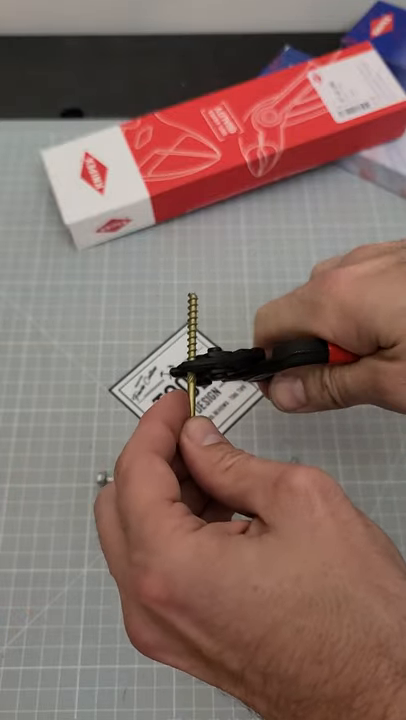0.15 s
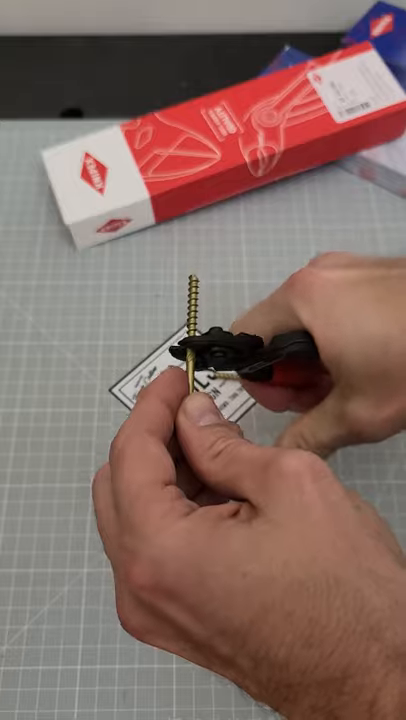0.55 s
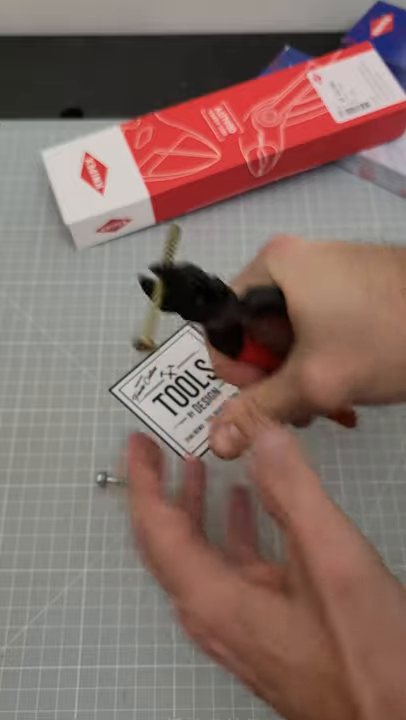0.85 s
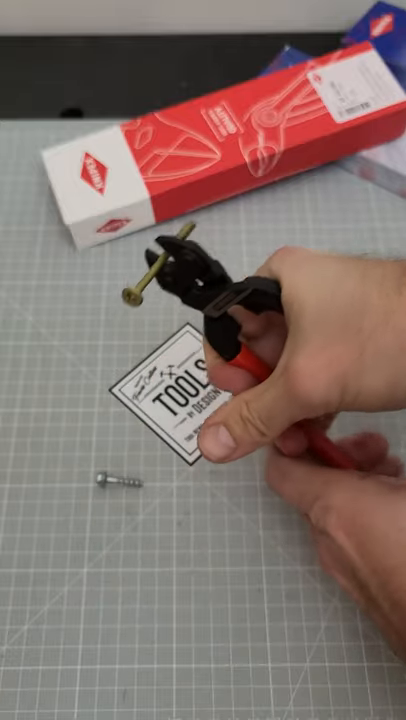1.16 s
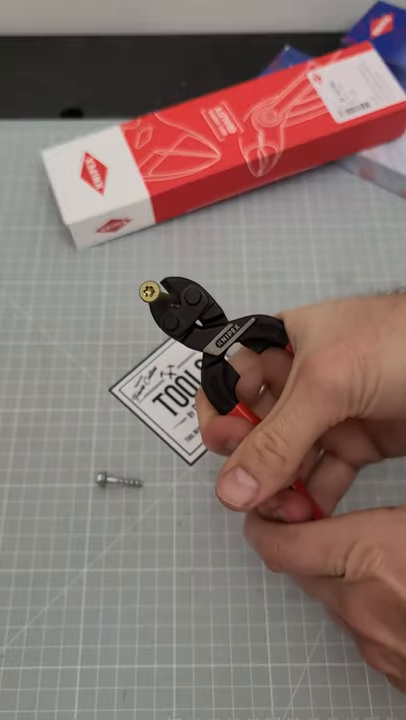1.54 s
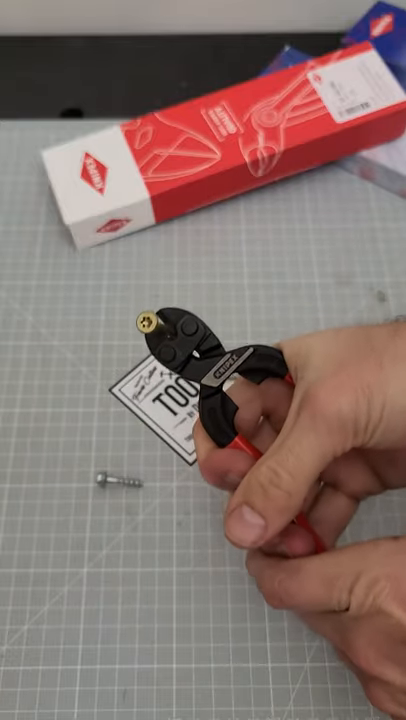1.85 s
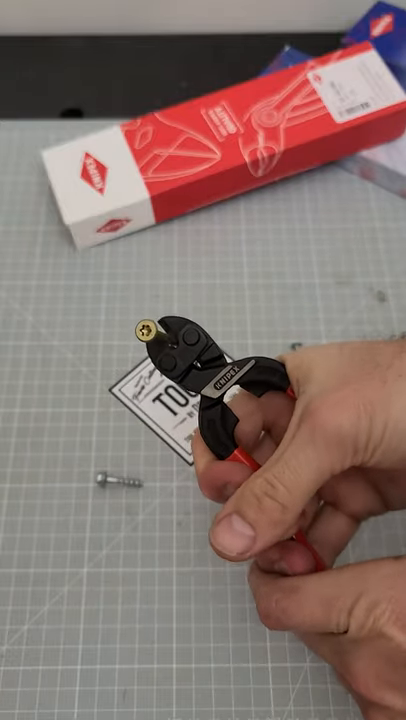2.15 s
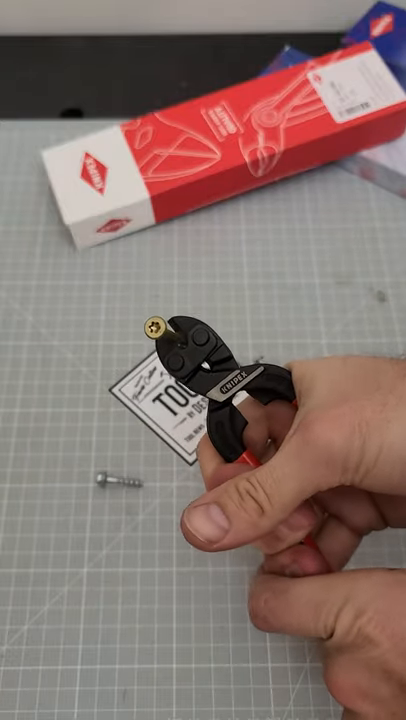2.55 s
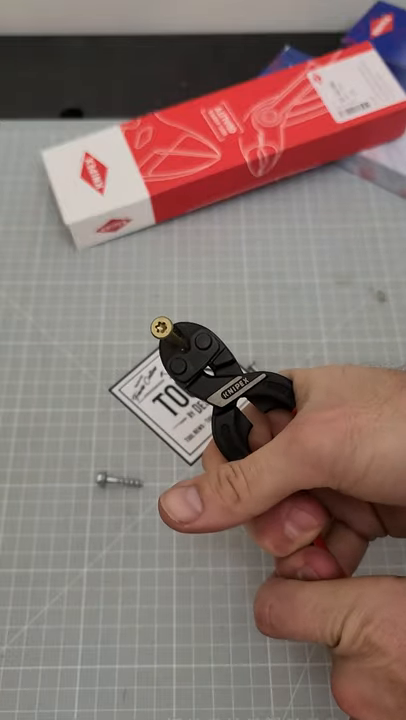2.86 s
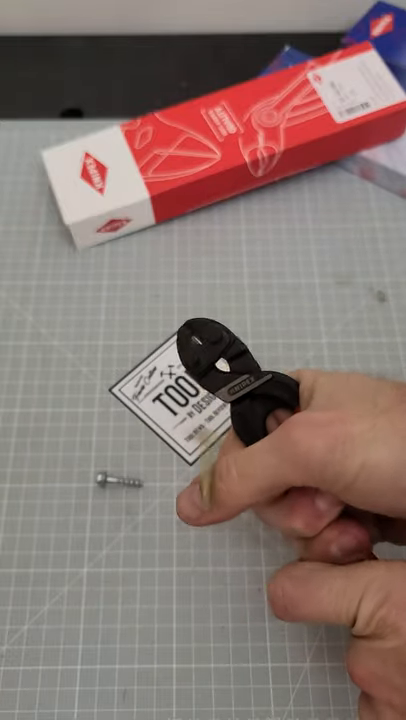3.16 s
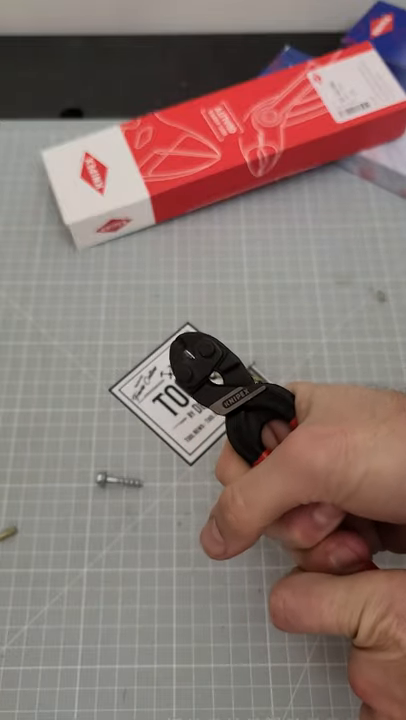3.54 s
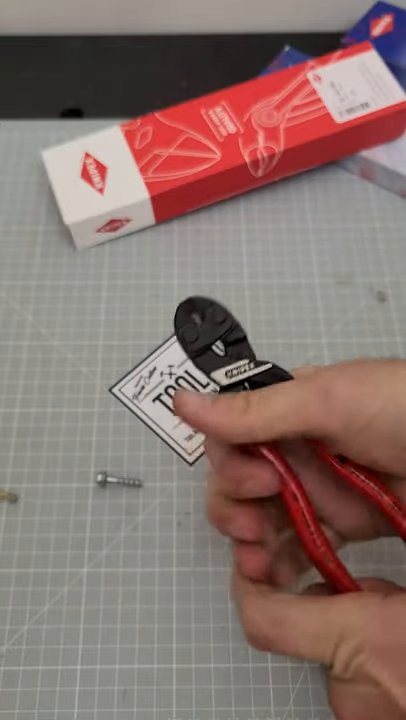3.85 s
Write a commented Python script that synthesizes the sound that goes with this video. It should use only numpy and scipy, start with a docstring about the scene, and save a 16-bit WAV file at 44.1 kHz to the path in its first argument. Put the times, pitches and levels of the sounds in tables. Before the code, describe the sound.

Small bolt cutters snap a steel screw, heard close in a quiet room. Faint jaw scrapes, soft bumps and a hand rubbing over a mat fill the first two seconds. From 2.4 to 2.9 seconds the jaws tick under load. At 3.1 comes the loud, sharp snap with a brief metallic ring. The cut piece bounces and clinks on the table, rolls, and drops off with a dull thud at 3.8.

```python
"""In a quiet, bare room, small bolt cutters bite through a steel screw above a table.
A hand rubs over the cutting mat, exciting friction noise. The jaws tick by stick-slip as the load builds,
then the screw fractures and the impulse sets the steel ringing. A cut piece bounces and rings on the
mat, rolls away and drops off the table with a dull thud. Each impact is a click with a short, dense
vibration; the stronger ones add decaying modes and the room's diffuse reverberation."""
import sys
import numpy as np
from scipy import signal
from scipy.fft import rfft, irfft
from scipy.io import wavfile

SR = 44100
rng = np.random.default_rng(int(sys.argv[2]) if len(sys.argv) > 2 else 0)


def dump(signal):
    """Clip the signal to [-1, 1] and save it as 16-bit WAV at the path in sys.argv[1]."""
    limited = np.clip(np.atleast_2d(signal).T, -1, 1)
    pcm = np.round(limited * 32767).astype(np.int16)
    wavfile.write(sys.argv[1], SR, pcm)


N = 176400

# spectrum of an impact on the mat: frequency_hz, gain_db
MAT_COLOUR = [(30, -31), (70, -18), (130, -7), (220, -9), (400, -2), (800, 2), (1300, 0), (2000, -3),
              (2600, 0.5), (4000, -6), (5300, -8), (7500, -17), (12000, -12), (15500, -14)]
# normal modes of the cut piece: pitch_hz, level_db, t60_s
SCREW_MODES = [(9898, 0, .3), (11885, -21, .28)]
# normal modes of the table: pitch_hz, level_db, t60_s
TABLE_MODES = [(128, -25, .14), (165, -25, .12), (410, -17, .18), (610, -18, .18), (775, -20, .18),
               (1165, -19, .18), (1340, -19, .18), (1580, -20, .18), (1960, -20, .18), (2530, -16, .18),
               (3280, -19, .18)]


def amp(db):
    """Decibels as an amplitude ratio."""
    return 10 ** (np.asarray(db) / 20)


def read(points, hz):
    """Interpolation of a table on a log-frequency axis."""
    f, value = np.transpose(points)
    return np.interp(np.log(hz + 1), np.log(f), value)


def unit(x):
    """Normalisation to a mean energy of one per channel."""
    return x / np.sqrt(np.mean(np.sum(x ** 2, -1)) + 1e-20)


def add(mix, start_s, sound):
    """Superposition of a sound on the mix, in place."""
    part = mix[:, round(start_s * SR):][:, :sound.shape[-1]]
    part += sound[..., :part.shape[1]]


def noise(size):
    """Partial coherence: white noise at two microphones, alike at long wavelengths."""
    # left-right coherence: frequency_hz, correlation
    coherence = [(60, 0.9), (200, 0.84), (500, 0.88), (1200, 0.14), (4000, 0.23), (16000, 0.0325)]
    a, b = rfft(rng.standard_normal((2, size)))
    same = np.clip(read(coherence, np.fft.rfftfreq(size, 1 / SR)), -1, 1)
    mid, side = a * np.sqrt((1 + same) / 2), b * np.sqrt((1 - same) / 2)
    return irfft(np.array([mid + side, mid - side]), size)


def pulse(colour, tilt_db=0, cut_hz=None, size=2048):
    """A minimum-phase click, tilted by tilt_db per octave; a soft contact acts as a low-pass filter."""
    hz = abs(np.fft.fftfreq(size, 1 / SR))
    gain = amp(read(colour, hz) + tilt_db * np.log2(np.maximum(hz, 200)))
    if cut_hz:
        gain = gain / np.sqrt(1 + (hz / cut_hz) ** 6)
    spectrum = np.exp(np.conj(signal.hilbert(np.log(gain))))
    return unit(np.fft.ifft(spectrum).real)


def blow(click, shake_db, shake_t60, size=6000):
    """Impulse response: a click and the dense, damped vibration of what it hits."""
    left_lag_s = .00004  # the sound reaches the right microphone first
    decay = amp(-60 * np.arange(size) / SR / shake_t60)
    response = amp(shake_db) * unit(noise(size) * decay)
    response[0, round(left_lag_s * SR)] += 1
    response[1, 0] += 1
    return unit(signal.fftconvolve(response, click[None], axes=1))


def ring(modes, size=30000, start_s=0):
    """Free vibration: damped modes swell in two cycles; blows timed by start_s add in phase."""
    t = np.arange(size) / SR
    out = np.zeros((2, size))
    for hz, db, t60 in modes:
        mic_phase = rng.choice([-1, 1]) * np.array([[1], [-1]]) * min(hz / 1200, .6)
        swell = np.sin(np.pi / 2 * np.minimum(t * hz / 2, 1)) ** 2
        tone = np.sin(2 * np.pi * hz * (t + start_s) + mic_phase)
        out += amp(db) * unit(swell * tone * np.exp(-np.log(1000) * t / t60))
    return out


def reverb(sound, size=32768, build_s=0.01):
    """Reverberation: a diffuse field builds up, then each band decays exponentially at its own rate."""
    # reverberation time: frequency_hz, t60_s
    decay_times = [(100, 0.26), (400, 0.49), (1500, 0.53), (4000, 0.37), (8000, 0.33), (15000, 0.22)]
    # spectrum of the reflections: frequency_hz, gain_db
    colour = [(100, -2.5), (400, 8), (1200, 5), (2500, 7.5), (6000, 8.5), (10000, 10), (16000, 1.5)]
    hz, t, bands = signal.stft(noise(size), SR, nperseg=256)
    decay = np.exp(-np.log(1000) * t / read(decay_times, hz)[:, None])
    bands = bands * amp(read(colour, hz))[:, None] * decay
    build = 1 - np.exp(-np.arange(size) / SR / build_s)
    tail = signal.istft(bands, SR, nperseg=256)[1][:, :size] * build
    return signal.fftconvolve(sound, unit(tail), axes=1)


def room(sound, wet_db):
    """The direct sound plus its reverberant field."""
    out = amp(wet_db) * reverb(sound)
    add(out, 0, sound)
    return out


def air():
    """The noise floor: broadband rumble and hiss, and a hum that wavers by phase modulation."""
    # spectrum of the room noise: frequency_hz, gain_db
    colour = [(20, -12), (33, -6), (55, 0), (80, -7), (125, -10), (200, -16), (300, -13), (450, -18),
              (700, -19), (1100, -23), (1800, -28.5), (3000, -33), (4500, -38.5), (6000, -46), (7900, -45),
              (9100, -37), (12500, -38.5), (15500, -43.5)]
    # partials of the hum: pitch_hz, level_db
    partials = [(52, -69), (98.4, -77), (148.3, -73), (296, -85), (445.5, -85)]
    t = np.arange(N) / SR
    hiss = irfft(rfft(noise(N)) * amp(read(colour, np.fft.rfftfreq(N, 1 / SR))), N)
    knots = np.linspace(0, N / SR, num=24)
    hum = np.zeros(N)
    for hz, db in partials:
        drift = .5 * np.interp(t, knots, rng.standard_normal(len(knots)))
        hum += amp(db) * np.sqrt(2) * np.sin(2 * np.pi * hz * t + drift)
    return amp(-64.8) * hiss / hiss.std() + hum


def hand_bumps():
    """Soft impacts excite mainly low frequencies: the hands shift their grip and nudge the table."""
    # bumps of the hands: start_s, level_db
    nudges = [(.160, -31), (.215, -34), (.615, -33), (.995, -29), (1.050, -30)]
    # spectrum of a bump: frequency_hz, gain_db
    colour = [(30, -12), (90, 0), (160, -9), (400, -24), (1500, -50), (6000, -75)]
    out = np.zeros((2, N))
    for start_s, db in nudges:
        add(out, start_s, amp(db) * blow(pulse(colour), shake_db=14, shake_t60=.3))
    return out


def hand_rub(slips_per_s=1100, spread_db=5.5, edge_power=19):
    """Friction noise: skin catches and slips on the mat in tiny grains, duller as the hand slows."""
    # one curve for each stroke: time_s, level_db, top_hz, tilt_db_per_octave
    strokes = [
        [(.12, -82, 1300, 5), (.20, -68.5, 1400, 8), (.49, -68, 1400, 9), (.53, -64.5, 1400, 11),
         (.58, -70, 1420, 8), (.61, -65.5, 1460, 6), (.68, -65.5, 1480, 6), (.76, -82, 1500, 5)],
        [(.968, -80, 3300, 5), (.988, -55.5, 3400, 6.5), (1.04, -59, 3100, 5), (1.08, -58.5, 3100, 4.5),
         (1.108, -64, 2900, 2.5), (1.142, -56, 3200, 4), (1.19, -62.5, 2800, 0), (1.238, -54, 3100, 0.5),
         (1.27, -55, 2300, -0.5), (1.33, -51.5, 2550, 0), (1.41, -55, 2200, -2), (1.46, -58, 2000, -4),
         (1.56, -58, 1900, -6), (1.63, -61, 1150, -2), (1.80, -61, 950, 0), (1.85, -64, 920, 0),
         (1.99, -63.5, 920, 1), (2.18, -77, 850, 0)],
    ]
    # spectrum of one slip: frequency_hz, gain_db
    colour = [(150, -22), (400, -8), (520, -6), (620, 1), (800, 1), (900, -4), (1150, -2), (1380, -2),
              (1700, -3), (2200, -8), (2650, -4), (3200, -6), (6000, -12)]
    t = np.arange(N) / SR
    out = np.zeros((2, N))
    for stroke in strokes:
        time_s, db, top_hz, tilt_db = np.transpose(stroke)
        slips = (rng.random(N) < slips_per_s / SR) * rng.choice([-1, 1], N)
        slips = slips * amp(spread_db * np.clip(rng.standard_normal(N), -2, 2))
        grain = room(blow(pulse(colour), shake_db=-3, shake_t60=.03), wet_db=-8)
        friction = signal.oaconvolve(slips[None], grain, axes=1)[:, :N]
        hz, frame_s, spectra = signal.stft(friction, SR, nperseg=512)
        ratio = np.maximum(hz[:, None], 500) / np.interp(frame_s, time_s, top_hz)
        band = amp(np.interp(frame_s, time_s, tilt_db) * np.log2(ratio))
        band /= np.sqrt(1 + ratio ** edge_power)
        band /= np.linalg.norm(band * amp(read(colour, hz))[:, None], axis=0)  # same power in any band
        rub = signal.istft(spectra * band, SR, nperseg=512)[1][:, :N]
        envelope = amp(np.interp(t, time_s, db)) * (t > time_s[0]) * (t < time_s[-1])
        out += rub / rub.std() * envelope
    return out


def roll(start_s=3.56, end_s=3.745, bumps_per_s=260):
    """Rolling noise: the thread's random, fading bumps excite the table and the piece's upper mode."""
    t = np.arange(N) / SR
    fade = (t > start_s) * np.sqrt(np.clip((end_s - t) / (end_s - start_s), 0, 1))
    bumps = (rng.random(N) < bumps_per_s / SR) * rng.standard_normal(N) * fade
    contact = blow(pulse(MAT_COLOUR, tilt_db=-2, cut_hz=3060), shake_db=-.5, shake_t60=.019)
    response = room(contact, wet_db=2)
    add(response, 0, ring(TABLE_MODES))
    add(response, 0, amp(-21) * unit(ring(SCREW_MODES[1:])))
    return amp(-28) * signal.oaconvolve(bumps[None], response, axes=1)[:, :N]


def bounces(spin_hz=7, spin_depth=.6):
    """Contact stiffness sets brightness: the piece lands hard on its edge, softer on its side."""
    # impacts on the mat: start_s, level_db, tilt_db_per_octave, cut_hz, ring_db
    impacts = [(3.212, -0.5, -2.9, 7000, -28), (3.2310, -2, 1.7, 9250, -10), (3.3682, 2, 3, 3810, -28),
               (3.375, 6.5, 1.6, 15900, -10), (3.3797, -7, -4, 1510, -35), (3.4460, -5.5, -1.5, 9200, -36),
               (3.5484, -14, 2, 2670, -40), (3.592, -18, 1, 6840, -42), (3.61, -27, -16, 4000, -47),
               (3.634, -20, 4, 5510, -47), (3.653, -30, 7.5, 4060, -51), (3.675, -27, -9, 4000, -42),
               (3.7016, -17.5, -2.5, 3430, -42)]
    out = np.zeros((2, N))
    for start_s, db, tilt_db, cut_hz, ring_db in impacts:
        hit = blow(pulse(MAT_COLOUR, tilt_db, cut_hz), shake_db=3.5, shake_t60=.042)
        add(out, start_s, amp(db) * room(hit, wet_db=-7))
        add(out, start_s, amp(db) * ring(TABLE_MODES))
        ping = ring(SCREW_MODES, start_s=start_s)
        # the tumbling piece turns its ring towards and away from the microphones
        spin = 1 - spin_depth * np.cos(2 * np.pi * spin_hz * np.arange(ping.shape[1]) / SR)
        add(out, start_s, amp(db + ring_db) * spin * ping)
    return out


def thud(pan_db=.4):
    """Impact excitation of low modes: the piece lands below the table with a dull, woody sound."""
    # the landing and the rattle to rest: start_s, level_db
    impacts = [(3.8129, 3.5), (3.8188, -7), (3.8289, 0)]
    # spectrum of the landing: frequency_hz, gain_db
    colour = [(60, -60), (130, -25), (280, -3), (520, -1), (640, -2), (870, -4.5), (1150, 0.5), (1480, 3),
              (2250, -13), (3100, -14.5), (5000, -32.5), (8000, -44.5), (16000, -45)]
    # modes that the landing excites: pitch_hz, level_db, t60_s
    modes = [(244.6, -18.5, 1), (304, -10.5, .3), (353, -19, 0.9), (458, -9.5, .23), (532, -12, .28),
             (621, -3, 0.15), (1024, -22, 0.24), (1156, -10, .18), (1325, -25, 0.26), (1472, -15, 0.17),
             (1625, -15.5, .24)]
    out = np.zeros((2, N))
    for start_s, db in impacts:
        hit = blow(pulse(colour), shake_db=7.5, shake_t60=.093)
        add(out, start_s, amp(db) * room(hit, wet_db=-11))
    add(out, impacts[0][0], amp(3.5) * ring(modes))
    return out * amp([[pan_db], [-pan_db]])


def jaws():
    """Stick-slip friction: the edges scrape as they find the thread, then tick as they sink in."""
    # jaws seating on the thread: start_s, level_db
    scrapes = [(.050, -54), (.110, -46), (.131, -48), (.190, -43), (.207, -44), (.258, -44), (.619, -50)]
    # spectrum of a scrape: frequency_hz, gain_db
    scrape_colour = [(300, -6), (1500, -3), (4000, -6), (6000, -1), (8000, -7), (11000, -2), (16000, -5)]
    # jaws slipping under load: start_s, level_db, tilt_db_per_octave
    slips = [(2.41, -36.5, 1), (2.452, -39, 0.5), (2.491, -45, 4), (2.519, -43, 6), (2.566, -30, 1.5),
             (2.6529, -25.5, -0.5), (2.701, -25.5, -1), (2.8157, -26, -1.5), (2.9350, -29.5, -1.5)]
    # spectrum of a slip: frequency_hz, gain_db
    slip_colour = [(150, -24), (480, -15), (640, 0), (880, -1), (1300, -7), (1650, 2), (1950, -4),
                   (2500, -15), (3500, -9), (4500, -8), (5200, -25), (8000, -26), (11000, -13),
                   (13500, -18), (15500, -15)]
    # spectrum of the jaws' ringing: frequency_hz, gain_db
    ring_colour = [(2400, -13), (3400, 1.5), (3900, 0), (4550, 1), (5200, -42.5)]
    out = np.zeros((2, N))
    for start_s, db in scrapes:
        add(out, start_s, amp(db) * blow(pulse(scrape_colour), shake_db=6, shake_t60=.05))
    for start_s, db, tilt_db in slips:
        tick = pulse(slip_colour, tilt_db)
        add(out, start_s, amp(db) * blow(tick, shake_db=9, shake_t60=.022))
        add(out, start_s, amp(db - 9) * blow(tick, shake_db=15, shake_t60=.06))
        ringing = blow(pulse(ring_colour), shake_db=20, shake_t60=.45, size=20000)
        add(out, start_s, amp(db - 13) * ringing)
    return room(out, wet_db=-20)[:, :N]


def snap():
    """Fracture releases elastic energy: the screw breaks, the jaws slam shut, steel and room ring on."""
    # the crack, then the jaws colliding: start_s, level_db, tilt_db_per_octave
    impacts = [(3.1233, 12, -1), (3.1249, 8, 4), (3.1249, 7, 0.5), (3.1265, -4, 5.5), (3.1348, -4, 4.5)]
    # spectrum of the break: frequency_hz, gain_db
    colour = [(30, -42), (130, -36), (220, -16.5), (340, -4), (850, -9), (1250, -4), (1600, 2), (2000, 1.5),
              (2450, -2), (2900, -5.5), (4200, -1), (5000, -15.5), (6100, -6.5), (7300, -17), (8300, -7),
              (10500, -4), (12700, -0.5), (14000, -7), (15500, -8.5)]
    # hand-damped jaw resonances: pitch_hz, level_db, t60_s
    damped_modes = [(1614, -6.5, 0.0076), (2057, -5, 0.013), (2452, -4, 0.023), (3290, -11, 0.028),
                    (4080, -17, 0.015)]
    # long-ringing modes of the cutters and the freed screw piece: pitch_hz, level_db, t60_s
    steel_modes = [(1563, -17, .22), (2401, -11, .42), (3350, -18, .25), (3915, -19, .25), (4085, -21, .25),
                   (6000, -23, .33), (6385, -25, .26), (9912, -20, .42), (11865, -15, .4),
                   (11905, -21, .42), (12533, -20, .22)]
    out = np.zeros((2, N))
    for start_s, db, tilt_db in impacts:
        add(out, start_s, amp(db) * blow(pulse(colour, tilt_db), shake_db=3, shake_t60=.0047))
    crack_s, crack_db, _ = impacts[0]
    add(out, crack_s, amp(crack_db - 4) * ring(damped_modes, size=2000))
    add(out, crack_s, amp(7.5) * reverb(pulse(colour, tilt_db=1)[None]))
    add(out, crack_s, amp(8.5) * ring(steel_modes))
    return out


def scene():
    """Linear superposition of all the sources."""
    return air() + hand_bumps() + hand_rub() + jaws() + snap() + bounces() + roll() + thud()


def record(dry):
    """Soft saturation rounds the loudest peaks; a low-pass filter limits the band."""
    low_pass = signal.firwin(161, cutoff=16100, window=("kaiser", 9), fs=SR)
    return signal.oaconvolve(np.tanh(dry), low_pass[None], "same")


dry = scene()
out = record(dry)
dump(out)
```